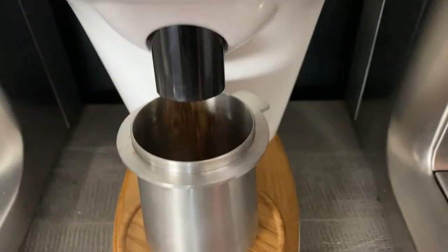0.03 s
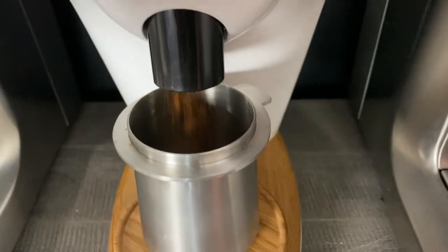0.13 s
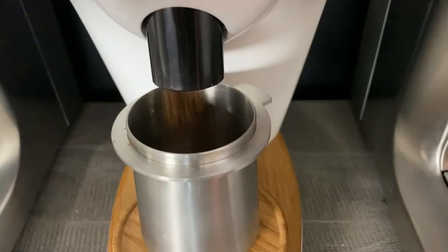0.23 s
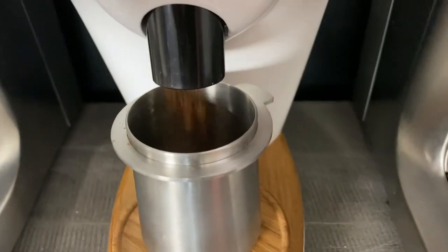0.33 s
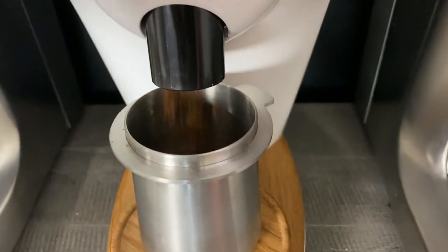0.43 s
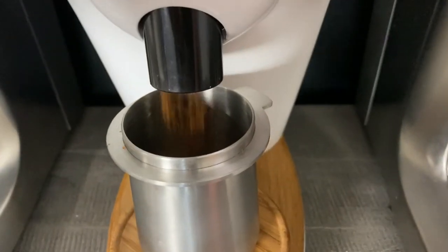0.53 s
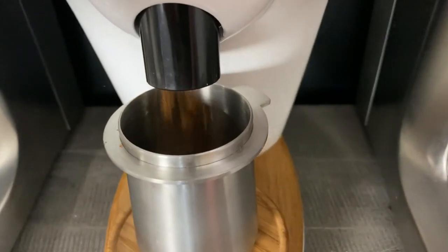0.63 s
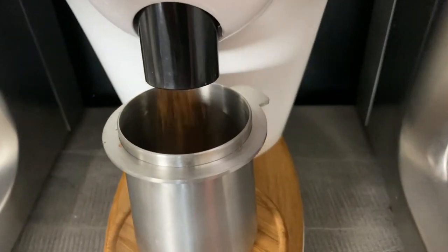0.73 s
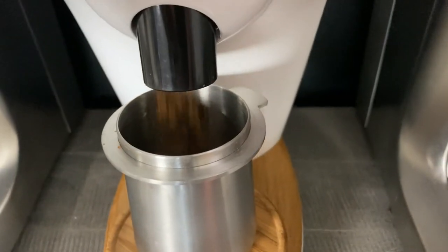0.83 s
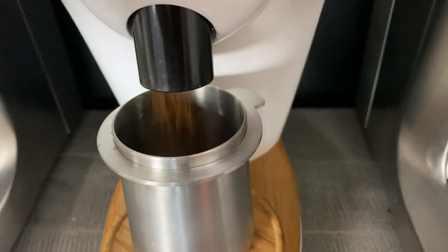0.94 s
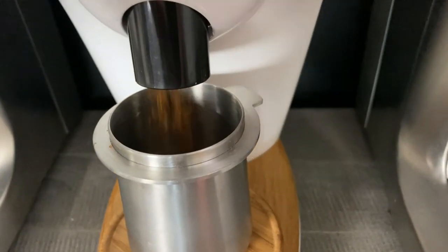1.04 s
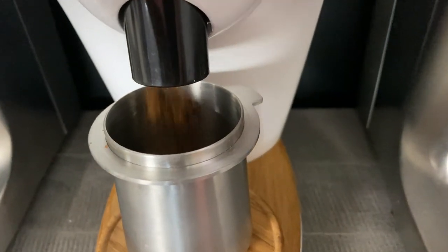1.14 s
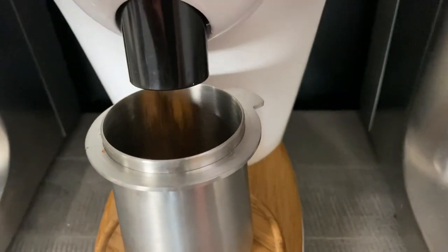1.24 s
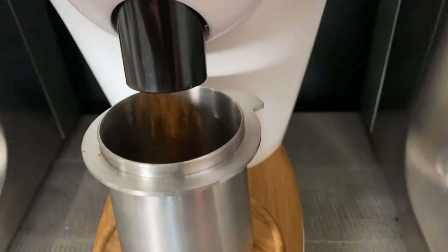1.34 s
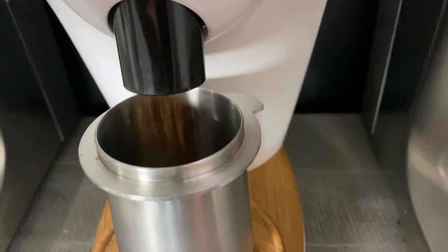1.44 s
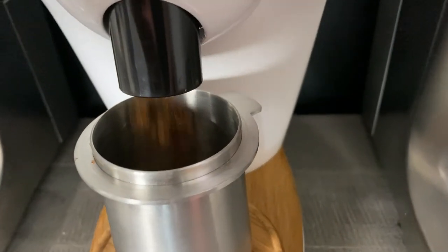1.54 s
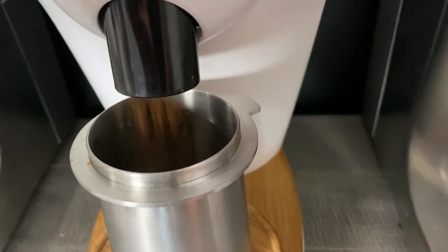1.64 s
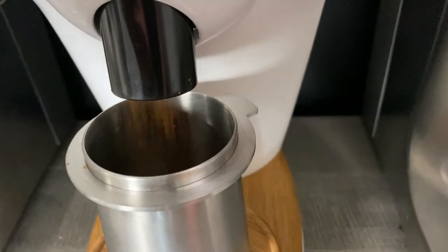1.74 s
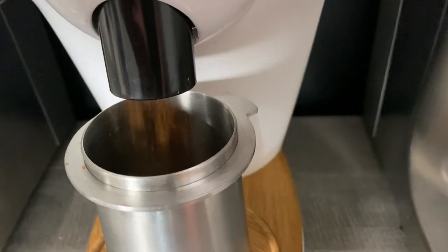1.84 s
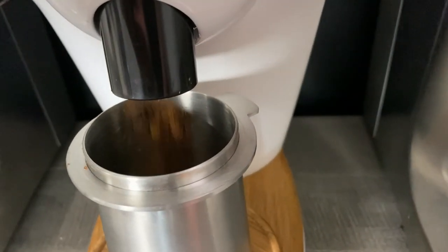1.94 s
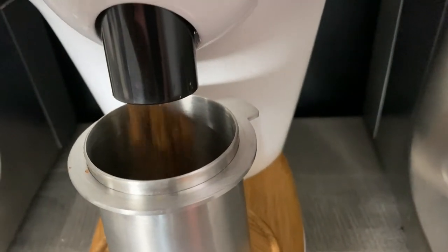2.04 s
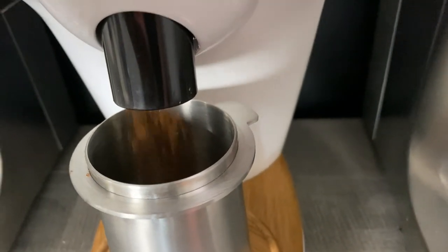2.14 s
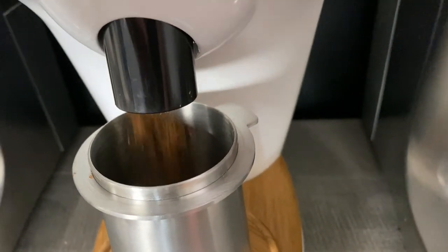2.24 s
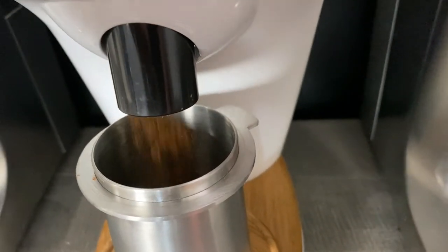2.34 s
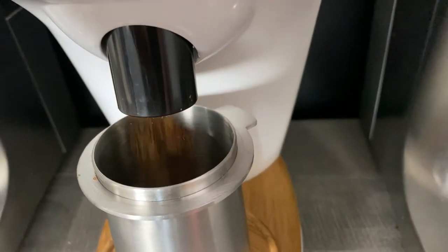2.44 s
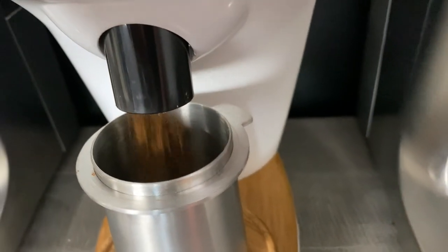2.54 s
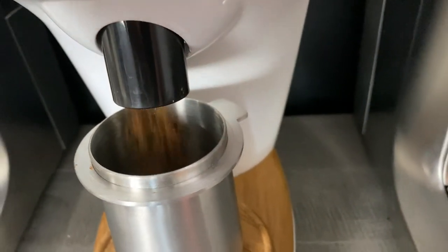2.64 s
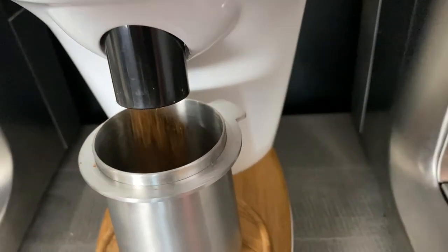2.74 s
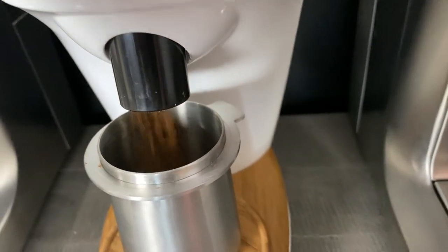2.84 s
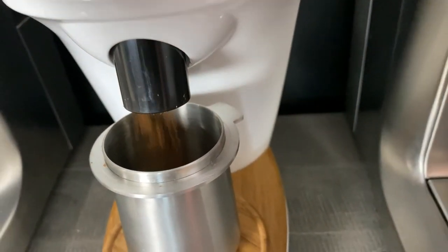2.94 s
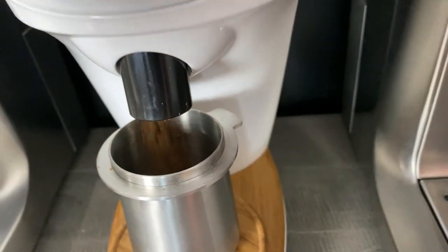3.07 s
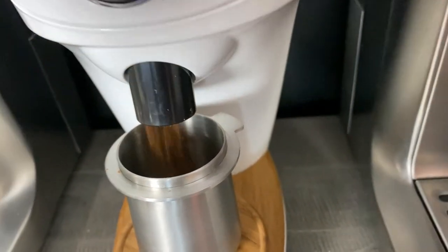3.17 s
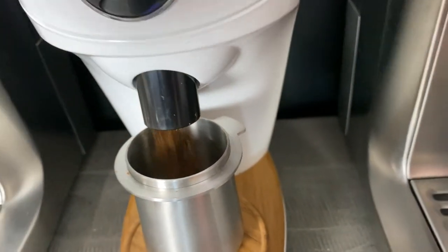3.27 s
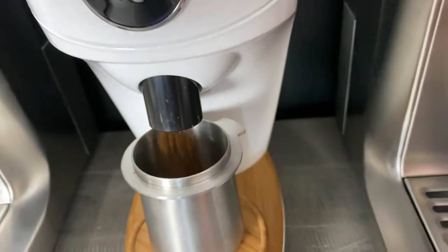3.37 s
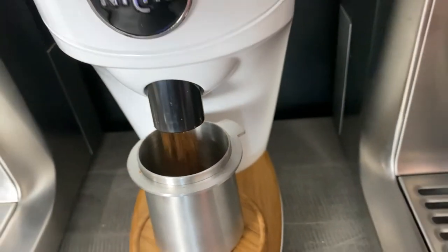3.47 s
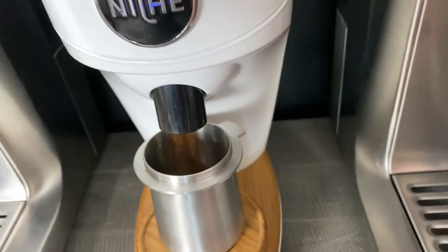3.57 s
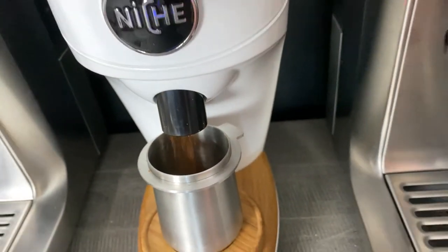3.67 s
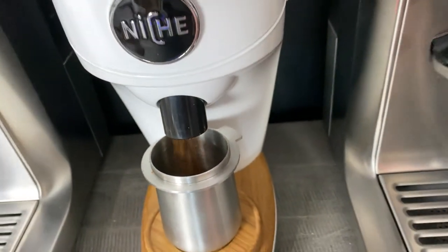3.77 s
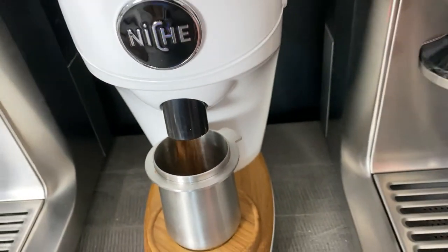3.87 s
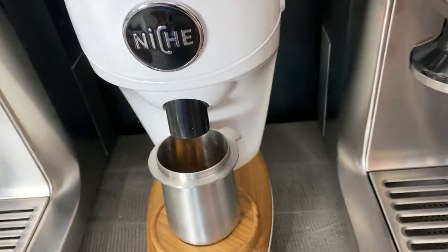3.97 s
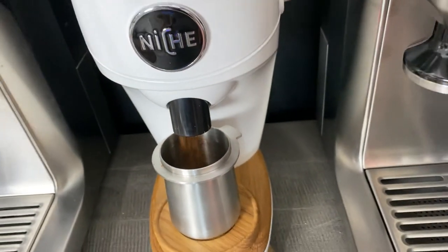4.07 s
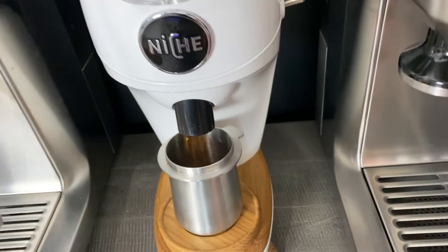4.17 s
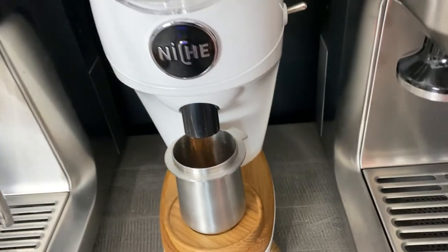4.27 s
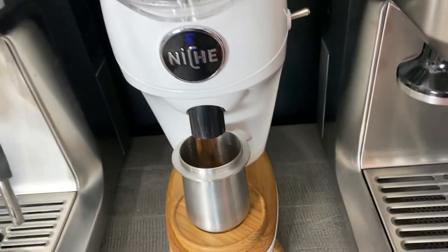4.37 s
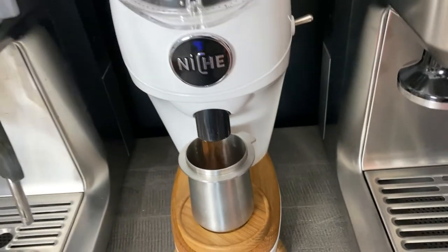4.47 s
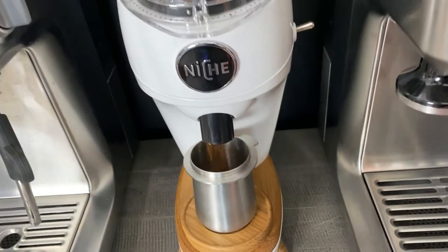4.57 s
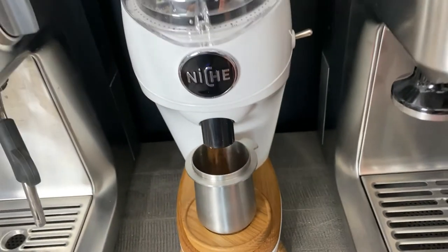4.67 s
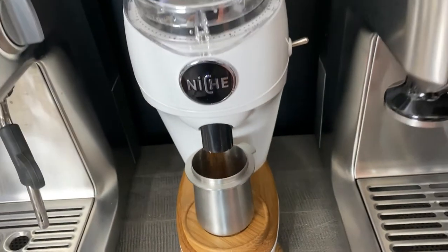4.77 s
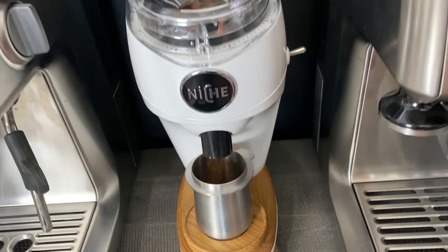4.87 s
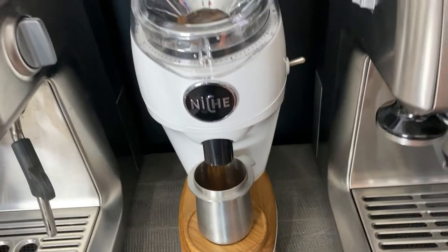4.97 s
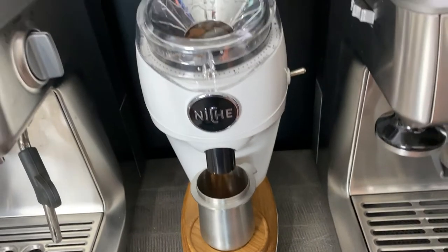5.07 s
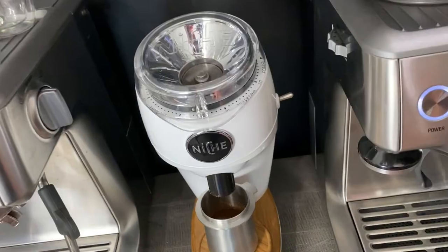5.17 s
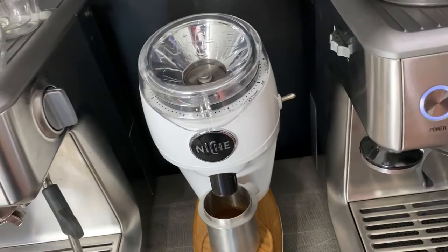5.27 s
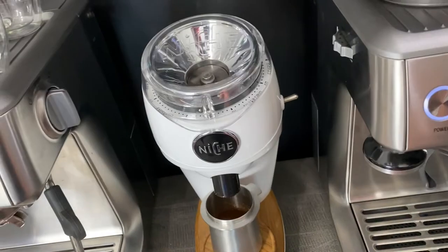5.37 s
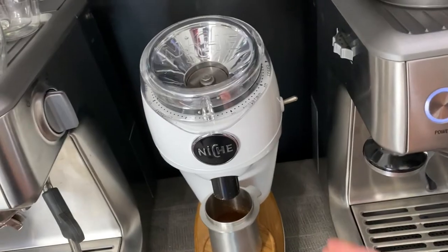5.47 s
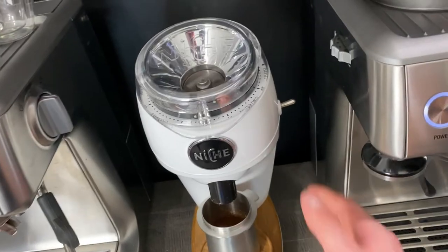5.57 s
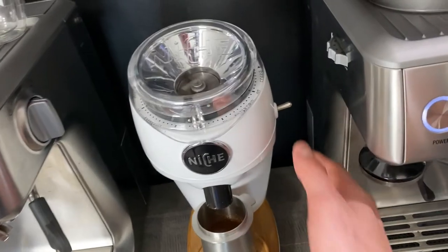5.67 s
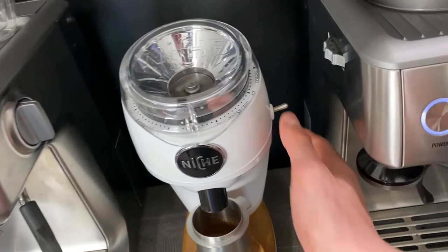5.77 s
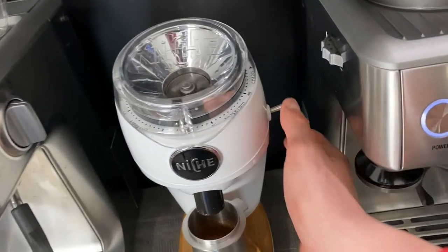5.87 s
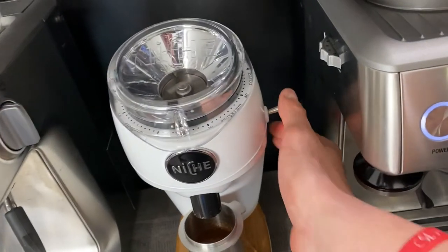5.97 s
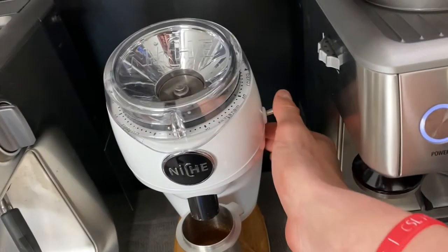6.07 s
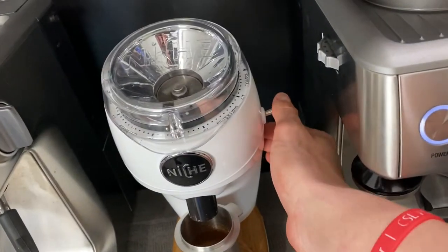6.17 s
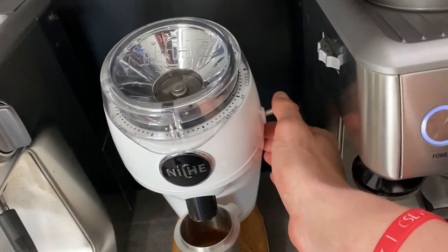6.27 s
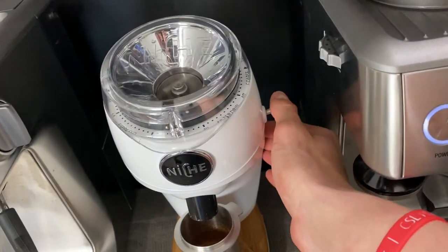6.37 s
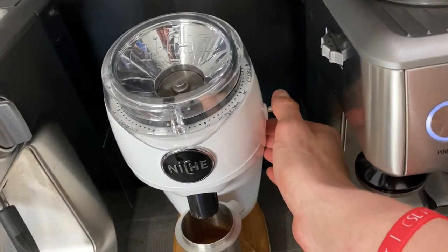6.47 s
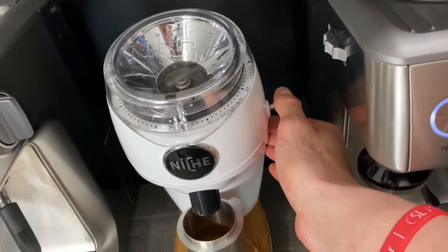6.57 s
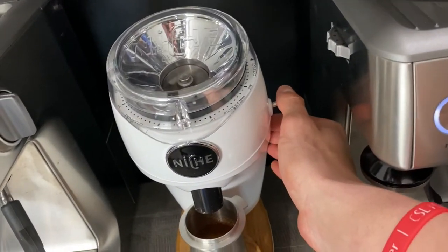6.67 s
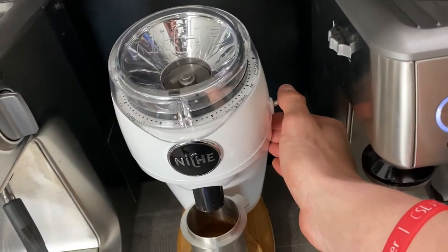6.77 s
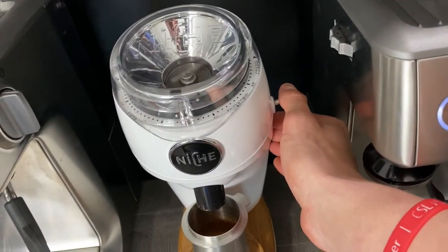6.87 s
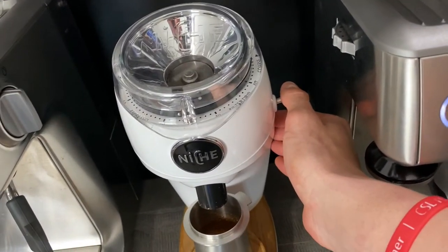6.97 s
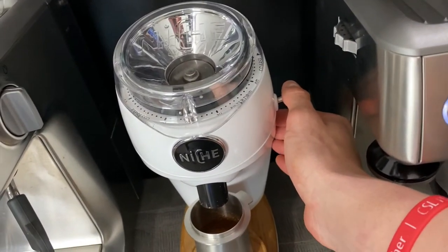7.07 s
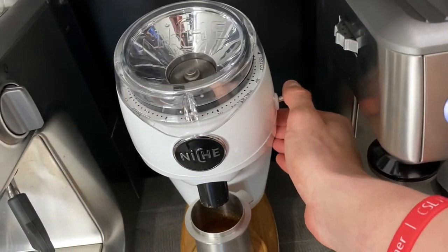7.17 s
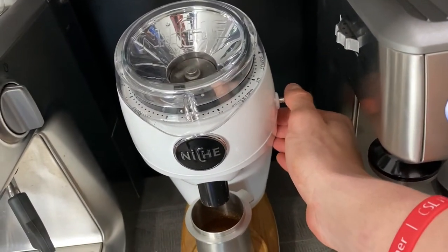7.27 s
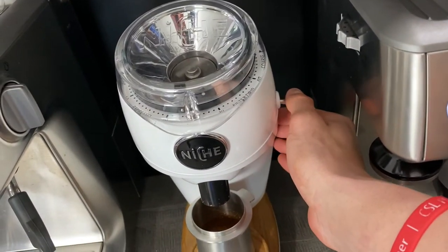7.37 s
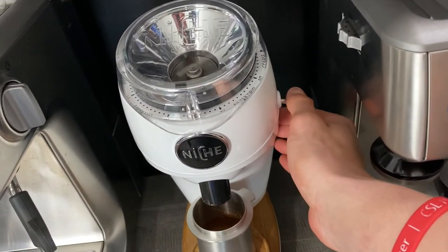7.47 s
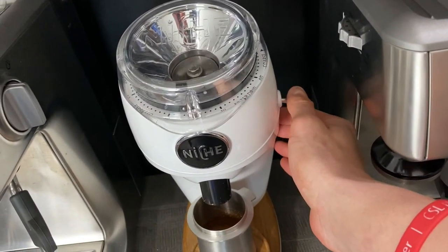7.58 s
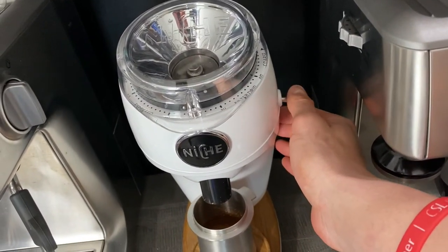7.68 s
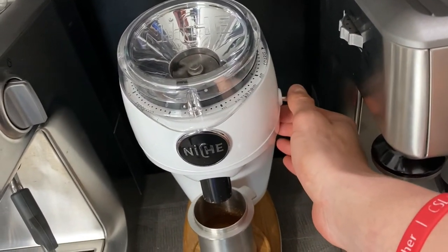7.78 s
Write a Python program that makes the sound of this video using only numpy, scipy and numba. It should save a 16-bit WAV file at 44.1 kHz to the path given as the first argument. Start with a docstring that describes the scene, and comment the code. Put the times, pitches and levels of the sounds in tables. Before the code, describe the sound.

Close to a hand-held phone in a kitchen, an electric burr grinder crushes coffee beans with a dense, rough crunch, fine crackle, sharp splits and low jolts over a mains hum. The crunch gradually thins, rings more in the funnel, then ends abruptly. Gears rattle much more quietly in a repeating pattern until a toggle switch snaps and the motor coasts downward.

```python
"""An electric burr grinder works on a kitchen counter, close to a hand-held phone. Beans crack and crumble between
the burrs: showers of random clicks ring the housing and funnel, with splits and jolts on top, over the mains hum.
The crunch thins out and ends abruptly. The gears rattle on: knocks at fixed places, much alike every turn.
A toggle switch snaps the power off, made from short puffs of noise. The motor then coasts and its gear tones slide
down. Behind it all lies the kitchen's faint drone and whine."""
import sys
import numpy as np
from scipy import signal
from scipy.fft import rfft, irfft
from scipy.io import wavfile
from scipy.ndimage import uniform_filter1d
from numba import njit

SR = 44100
rng = np.random.default_rng(int(sys.argv[2]) if len(sys.argv) > 2 else 0)


def waveform_to_disk(signal):
    """Save audio, clipped to [-1, 1], as 16-bit WAV at the path in sys.argv[1]."""
    frames = np.transpose(np.atleast_2d(signal))
    scaled = np.clip(frames, -1, 1) * 32767
    samples = np.round(scaled).astype(np.int16)
    wavfile.write(sys.argv[1], SR, samples)


N = 344421
T = np.arange(N) / SR  # time of each sample, s

# the crunch starts to thin, ends abruptly, and later the power goes off
THINNING_S, CRUNCH_END_S, POWER_OFF_S = 2.3, 5.234, 7.29

# tone of the crunch, the fine crackle and the low rumble: (frequency [Hz], relative level [dB])
CRUNCH_SPECTRUM = [(100, -29), (220, -11.5), (330, -10.5), (480, -6.5), (680, -3), (900, -8), (1500, -7.5),
                   (2000, -15), (2300, -23), (3300, -27), (4800, -34), (6500, -38), (15000, -61)]
CRACKLE_SPECTRUM = [(1000, -31.5), (2500, 5.5), (4500, 6.5), (5500, 0), (6500, -20), (8000, 5), (9500, 12),
                    (10500, 8), (11500, 11.5), (12500, 6.5), (14500, 4), (16000, -1)]
RUMBLE_SPECTRUM = [(22, -48), (40, -17.5), (60, -8.5), (82, 2), (100, -12), (128, -1), (165, -4),
                   (200, -10), (300, -20), (500, -39.5)]
# ringing of the housing: (frequency [Hz], width [Hz], lift [dB])
HOUSING_MODES = [(670, 240, 4), (1603, 21, -2.5), (1860, 400, 5.5), (2495, 120, 5.5), (2900, 200, 8.5),
                 (3240, 200, 6.5), (3600, 90, 2), (4200, 400, 4), (4800, 280, 5.5), (5850, 450, 5),
                 (7200, 600, 11)]
# ring of the bean funnel, which comes forward as the crunch thins: (time [s], level against the crunch [dB])
FUNNEL_LEVEL = [(0, -26), (2.7, -18), (3.4, -11), (3.95, -4), (4.3, -6.5), (4.7, -3), (5.2, -2)]
# swells and sags of the hum, which the crunch and rumble partly follow: (middle [s], length [s], lift [dB])
HUM_SWELLS = [(0.02, 0.16, 13.5), (.18, 0.073, -10), (.47, 0.23, 13.5), (.85, 0.083, -9),
              (1.457, 0.089, -16), (2.51, 0.085, -8), (2.663, 0.14, 5.5), (3.117, 0.1, -12),
              (3.982, 0.12, -7)]
# layers before echoes and swells: (level at full crunch dB, level at the end of the crunch dB)
CRUNCH_DB, CRACKLE_DB, RUMBLE_DB = (-21, -28.5), (-36.5, -43.5), (-31.5, -40)
# burr chamber and housing roar against the crunch: (at full crunch dB, at the end of the crunch dB)
CHAMBER_DB, ROAR_DB = (-10.5, -14.5), (-5.5, -13)
# resonances: middle Hz, width of each of two filter passes Hz, wander of the middle as a share
FUNNEL_BAND, CHAMBER_BAND, ROAR_BAND = (1345, 320, .035), (1905, 220, .025), (695, 170, .04)
# share of the hum's swells (in dB) that each layer follows
CRUNCH_SWELL_SHARE, RUMBLE_SWELL_SHARE = 0.11, 0.19

# whole beans splitting: (time [s], relative level [dB], ring [Hz], lift of the ring [dB])
BEAN_SPLITS = [(.1196, -25, 2950, 14), (.3631, -24, 2520, 12), (0.4863, -23, 4200, 12),
               (0.847, -24, 2920, 13), (1.0645, -25, 2880, 14), (1.5718, -25, 3270, 13),
               (2.172, -24, 3000, 12), (2.3246, -25, 2880, 13), (2.438, -12.5, 2100, 16),
               (2.449, -17.5, 3400, 11), (2.5157, -22, 3250, 13), (2.861, -16.5, 3260, 19),
               (2.978, -24, 3220, 18), (3.168, -23.5, 2510, 12), (3.5114, -24, 3220, 12),
               (3.674, -18.5, 3270, 16), (4.1575, -21, 2000, 13)]
# tone of a split: (frequency [Hz], relative level [dB])
SPLIT_SPECTRUM = [(300, -13), (1900, 4), (2600, 2), (3300, 3), (4200, 0), (5500, -5), (7000, -7),
                  (10000, -5), (15000, -6)]
# hard beans jolting the whole grinder: (time [s], level [dB])
HARD_BEANS = [(.625, -19), (1.179, -20), (1.325, -21), (1.395, -20), (1.605, -18), (1.688, -19.5),
              (1.75, -20), (1.82, -22), (1.94, -24), (2.136, -24), (2.281, -18.5)]
JOLT_HZ, JOLT_RISE_S = 144.3, 0.0063  # average pitch, time constant

# tight spots of the gears: (share of a burr turn [0-1], relative level [dB])
TIGHT_SPOTS = [(0, -3), (.047, -7), (.124, -1), (.16, -1), (.251, -5), (.329, 7.5), (.367, 1.5), (.425, -6),
               (.465, 3), (.543, 0), (.587, -5), (.666, 1.5), (.704, 2), (.815, -5), (.928, -1.5)]
# slack gears knocking as the motor coasts: (time [s], relative level [dB])
SLACK_KNOCKS = [(7.381, 4), (7.415, 3), (7.468, 3), (7.488, 7.5), (7.625, 5), (7.696, 4)]
# tone of the casing, the gear clack and the brushes: (frequency [Hz], relative level [dB])
CASING_SPECTRUM = [(40, -27), (80, 1.5), (200, -33), (330, -23), (520, -27), (660, -1), (850, -4),
                   (980, -11), (1300, -22), (3000, -56), (15000, -74)]
CLACK_SPECTRUM = [(300, -24), (700, -25), (1000, 7), (1550, 1), (2100, -13.5), (3100, -19), (5000, -34.5),
                  (15000, -41)]
BRUSH_SPECTRUM = [(400, 3), (1200, 11), (2000, 3.5), (3100, -7), (3700, -6), (4500, -6.5), (5300, -10),
                  (7000, -6.5), (9000, -5.5), (12000, -14.5), (15000, -11.5)]
# ringing of the gearbox: (frequency [Hz], width [Hz], lift [dB])
GEARBOX_MODES = [(682, 78, 10.4), (765, 26, 1.7), (840, 66, 9.9), (1016, 11, 3.8), (1211, 48, 7.3),
                 (1513, 27, 10.6), (2010, 17, 13), (2400, 50, 7.8), (2544, 100, 6.2), (3110, 310, 11),
                 (4410, 310, 12.2), (6980, 120, 2.3)]
# tones of the meshing teeth: (cycles per burr turn, relative level [dB])
MESH_TONES = [(100, -6), (123, -8), (137, -8), (149, 0), (178, -4)]
# magnetic whine of the rotor, only under power: (cycles per burr turn, level [dB])
ROTOR_TONES = [(149, -48), (647, -63), (826, -61.5), (1015, -74)]
# change of the rotor whine, added to those levels: (time [s], lift [dB])
ROTOR_LIFT = [(5.2, -10), (5.35, -2), (5.9, -6), (6.15, -4), (6.35, 0), (7.2, 0)]
IDLE_HZ, TURN_START_S = 6.831, 5.3  # burr turns per second running free, a moment when a turn starts
CRUNCH_SAG, COAST_PER_S = .07, .55  # speed share lost at full crunch, and lost per second of coasting
# layers before echoes: (running free dB, lift at full crunch dB, fall while coasting dB per s)
RING_DB, CLACK_DB, BRUSH_DB = (-37, 7, 13), (-41, 9.5, 28), (-45, -18, 30.5)
# the gears ring less until the crunch ends
DAMPED_DB = -5
# meshing tones: (level under power dB, lift once the power is off dB, fall while coasting dB per s)
MESH_DB = (-49, 8, 15)
# teeth and fast shaft against the knocks, scatter from blow to blow, scrape against each blow
TEETH_DB, SHAFT_DB, SCATTER_DB, SCRAPE_DB = -11.5, -17, .6, -22
# the magnetic pull peaks twice in each cycle of 60 Hz mains
PULL_HZ = 2 * 60
# hum before its swells: running free, grinding, and the typical size of its waver
HUM_FREE_DB, HUM_GRINDING_DB, HUM_WAVER_DB = -49.5, -36.5, 2.5

# lever, contacts and recoil: (time [s], relative level [dB], share reaching the shell [0-1], 60 dB decay [s])
SWITCH_BLOWS = [(7.2765, -19.5, 0.26, 0.055), (7.29, -9, 0.4, 0.0077), (7.289, -2, 0.13, 0.03),
                (7.2928, -2.5, 0.58, 0.027), (7.2950, -16, 0.8, 0.022), (7.3020, -15, 0.9, 0.025)]
# tone of the lever and of the plastic shell: (frequency [Hz], relative level [dB])
LEVER_SPECTRUM = [(400, -21), (1500, -1.5), (2100, -6), (3200, -0.5), (4200, 1.5), (5400, -9.5),
                  (6500, -9.5), (7500, -5), (8500, -7), (11000, -2.5), (15000, -14)]
SHELL_SPECTRUM = [(150, -35), (400, -12), (560, 2), (780, 6.5), (1200, 1.5), (2000, -1.5), (2700, 1.5),
                  (4000, -9), (7000, -8.5), (15000, -23)]
# ringing of the lever: (frequency [Hz], width [Hz], lift [dB])
LEVER_RINGS = [(2430, 160, 8), (2720, 160, 7), (3720, 380, 10), (4590, 160, 6), (5880, 140, 7),
               (6490, 160, 7)]
# tone of the kitchen's drone: (frequency [Hz], relative level [dB])
ROOM_SPECTRUM = [(22, -21), (55, 3.5), (100, -6.5), (250, -17.5), (800, -2), (2000, -42), (4500, -35),
                 (7000, -58), (15000, -46)]
# faint steady whine in the kitchen: (frequency [Hz], level [dB])
ROOM_WHINE = [(2094, -67), (4194, -70), (4721, -70)]
TOP_HZ = 15700  # highest pitch the phone keeps


def grinding(crumble_db=8.5):
    """Each fracture frees a short shower of fragments, which ring the housing and funnel and jolt the body."""
    crunch_db, crackle_db, rumble_db, chamber_db, roar_db = (
        end + (full - end) * fullness()
        for full, end in (CRUNCH_DB, CRACKLE_DB, RUMBLE_DB, CHAMBER_DB, ROAR_DB))
    funnel_db, = curves(FUNNEL_LEVEL)
    fractures = unit(fade(np.abs(grains(rate=330, spread_db=3)), t60=.013))
    # steady crumbling lies under the fractures; the torque pulses with the mains
    bite = (fractures + undb(crumble_db)) * (1 + 0.058 * np.sin(2 * np.pi * PULL_HZ * T))
    # the bite is uneven, more so as the crunch thins
    bite = bite * undb((1.3 - .5 * fullness()) * walk(rate=45) + .3 * walk(rate=8))

    chips = bite * grains(rate=2500, spread_db=2.5)
    funnel = resonance(chips, *FUNNEL_BAND) * undb(funnel_db)
    chamber = resonance(chips, *CHAMBER_BAND) * undb(chamber_db)
    roar = resonance(bite * grains(rate=700, spread_db=2.5), *ROAR_BAND) * undb(roar_db)
    crumbs = unit(colour(bite * grains(rate=6000, spread_db=1.5), CRUNCH_SPECTRUM, HOUSING_MODES))
    crunch = unit(crumbs + roar + funnel + chamber)
    crunch = crunch * undb(crunch_db + CRUNCH_SWELL_SHARE * swell_db())

    fine_bite = bite * undb(1.1 * walk(rate=27))
    fine_chips = fine_bite * grains(rate=7000, spread_db=3.0)
    crackle = unit(colour(fine_chips, CRACKLE_SPECTRUM, HOUSING_MODES)) * undb(crackle_db)
    rumble = unit(colour(bite * grains(rate=540, spread_db=3.5), RUMBLE_SPECTRUM))
    rumble = rumble * undb(rumble_db + RUMBLE_SWELL_SHARE * swell_db())

    sound = kitchen(crunch + crackle, near_db=-4.0, room_db=-7, left_db=2.0, count=5)
    sound += kitchen(rumble, near_db=-5.5, room_db=-3, left_db=-2.5, count=3)
    return sound * until(CRUNCH_END_S, fade_s=0.011)


def splits():
    """Whole beans burst with a sharp crack and a spray of pieces, and set the burr ringing."""
    cracks = 0
    for s, db, ring_hz, ring_db in BEAN_SPLITS:
        sharp_crack = undb(6) * burst(s, t60=.016)
        spray = undb(-1) * burst(s, t60=.055)
        cracks = cracks + undb(db) * colour(sharp_crack + spray, SPLIT_SPECTRUM, [(ring_hz, 340, ring_db)])
    return kitchen(cracks, near_db=-8, room_db=-14, left_db=1.2)


def jolts():
    """A hard bean rocks the body on its feet for a few cycles, each at a slightly different pitch."""
    thumps = 0
    for (s, db), detune in zip(HARD_BEANS, rng.standard_normal(len(HARD_BEANS))):
        age = np.maximum(T - s, 0)
        swing = age / JOLT_RISE_S * np.exp(1 - age / JOLT_RISE_S)
        hz = JOLT_HZ * (1 + 0.082 * detune)
        thumps = thumps + undb(db) * swing * np.sin(2 * np.pi * hz * age)
    return thumps


def gears():
    """Tight spots knock once a turn and teeth tick between them; brushes hiss and the fast rotor whines."""
    speed = 1 - CRUNCH_SAG * fullness() - COAST_PER_S * coasting()
    ring_db, clack_db, brush_db = (
        free + lift * fullness() - fall * coasting() for free, lift, fall in (RING_DB, CLACK_DB, BRUSH_DB))
    shaft = np.cumsum(speed) * IDLE_HZ / SR  # burr turns so far
    shaft -= shaft[int(TURN_START_S * SR)]
    # play between the teeth makes each contact a little early or late
    turn = shaft + .0003 * walk(rate=60)

    knocks = sum(undb(db) * strikes(turn - share) for share, db in TIGHT_SPOTS)
    teeth = undb(TEETH_DB) * (strikes(turn, count=24) + strikes(turn, count=30))
    fast_shaft = undb(SHAFT_DB) * strikes(turn, count=50)
    slack = sum(undb(db) * (np.arange(N) == int(s * SR)) for s, db in SLACK_KNOCKS)
    blows = (knocks + teeth + fast_shaft + slack) * undb(SCATTER_DB * rng.standard_normal(N))

    # tooth flanks scrape after each blow; part of their roughness comes round again every turn
    flanks = rng.standard_normal(8192)[(turn % 1 * 8192).astype(int) % 8192]
    scrape = fade(blows, t60=0.019) * (flanks + .5 * rng.standard_normal(N))
    contacts = blows + undb(SCRAPE_DB) * scrape
    damping_db = DAMPED_DB * until(CRUNCH_END_S, fade_s=.02)
    ring = unit(colour(contacts, CASING_SPECTRUM, GEARBOX_MODES)) * undb(ring_db + damping_db)
    clack = unit(colour(contacts, CLACK_SPECTRUM, GEARBOX_MODES)) * undb(clack_db)

    # as the motor slows, the meshing tones slide down through the gearbox resonances and flare in each
    mesh = 0
    for cycles, db in MESH_TONES:
        level = undb(db + 3 * walk(rate=25))
        mesh = mesh + level * np.sin(2 * np.pi * cycles * turn + .8 * walk(rate=30))
    powered_db, slack_db, fall_db = MESH_DB
    mesh_db = powered_db + slack_db * (T > POWER_OFF_S) - fall_db * coasting()
    mesh = unit(colour(mesh, CASING_SPECTRUM, GEARBOX_MODES)) * undb(mesh_db)

    # the brush noise swells briefly after each blow
    sparks = rng.standard_normal(N) * (1 + 0.47 * unit(fade(blows, t60=0.023)))
    hiss = unit(colour(sparks, BRUSH_SPECTRUM, GEARBOX_MODES)) * undb(brush_db)

    rotor_db, = curves(ROTOR_LIFT)
    whine = 0
    for cycles, db in ROTOR_TONES:
        level = np.sqrt(2) * undb(rotor_db + db + 2 * walk(rate=7.7))
        whine = whine + level * np.sin(2 * np.pi * cycles * shaft + .3 * walk(rate=15))
    whine = whine * until(POWER_OFF_S, fade_s=.02)

    rattle = kitchen(ring + clack + mesh, near_db=-14, room_db=-10, left_db=0, count=2)
    return rattle + kitchen(hiss, near_db=4.0, room_db=-4.5, left_db=2.5) + whine


def hum():
    """The motor's magnetic hum is louder while it grinds, swells and wavers, and stops with the power."""
    is_grinding = until(CRUNCH_END_S, fade_s=0.012)
    hum_db = HUM_FREE_DB + (HUM_GRINDING_DB - HUM_FREE_DB) * is_grinding + swell_db()
    phase = 2 * np.pi * PULL_HZ * T + 0.37 * walk(rate=4.9)
    tone = np.sqrt(2) * (np.sin(phase) + undb(-20.0) * np.sin(2 * phase))
    return tone * undb(hum_db + HUM_WAVER_DB * walk(rate=13)) * until(POWER_OFF_S, fade_s=0.018)


def switch():
    """The sprung lever snaps over, then thumps the plastic shell, which spreads the sound into the room."""
    lever, shell = 0, 0
    for s, db, share, t60 in SWITCH_BLOWS:
        blow = undb(db) * burst(s, t60)
        lever = lever + (1 - share) * blow
        shell = shell + share * blow
    snap = undb(1.5) * colour(lever, LEVER_SPECTRUM, LEVER_RINGS)
    thump = undb(6) * colour(shell, SHELL_SPECTRUM)
    return (kitchen(snap, near_db=-12, room_db=-14, left_db=1)
            + kitchen(thump, near_db=-7, room_db=-8, left_db=.6))


def room_tone():
    """Faint steady noise of the kitchen: filtered noise as a low drone, and a few sines as a thin whine."""
    whine = 0
    for hz, db in ROOM_WHINE:
        whine = whine + np.sqrt(2) * undb(db) * np.sin(2 * np.pi * hz * T + 0.45 * walk(rate=31))
    drone = unit(colour(rng.standard_normal(N), ROOM_SPECTRUM)) * undb(-46.0)
    return whine + kitchen(drone, near_db=-6.0, room_db=-26, left_db=-1.5)


def kitchen(x, near_db, room_db, left_db, count=1):
    """Direct sound, quick reflections from the machines alongside and the room's tail, different at each port.
    As the phone moves, the echo pattern wanders between count places."""
    t = T[:SR // 3]
    places = np.array([walk(rate=1.201) for _ in range(count)]) if count > 1 else np.ones((1, N))
    places /= np.linalg.norm(places, axis=0)
    echo_spectrum = [(40, -11), (130, -3.0), (350, -7), (650, -1.5), (2500, 4.5), (5500, 3.0), (9000, -1.5)]
    out = np.array([x, x])
    for port in range(2):
        for weight in places:
            # noise dying by 60 dB in t60 seconds: quick reflections, then the tail
            near, tail = (
                rng.standard_normal(len(t)) * undb(-60 * t / t60) * (t > .001) for t60 in (.035, .38))
            echoes = undb(near_db) * near / np.linalg.norm(near)
            echoes = echoes + undb(room_db) * tail / np.linalg.norm(tail)
            echoes = colour(echoes, echo_spectrum)
            out[port] += weight * signal.oaconvolve(x, echoes)[:N]
    return out * undb([[left_db / 2], [-left_db / 2]])


def fullness():
    """1 at full crunch, falling to 0 where the crunch abruptly ends."""
    return np.clip((CRUNCH_END_S - T) / (CRUNCH_END_S - THINNING_S), 0, 1)


def coasting():
    """Seconds since the power went off."""
    return np.maximum(T - POWER_OFF_S, 0)


def swell_db():
    """Rounded swells and sags of the hum, in dB, which the crunch and rumble partly follow."""
    return sum(lift_db * np.maximum(1 - (2 * (T - s) / length) ** 2, 0) for s, length, lift_db in HUM_SWELLS)


def strikes(turn, count=1):
    """A unit impulse, count times in each turn."""
    return np.diff(np.floor(turn * count), prepend=np.floor(turn[0] * count))


def grains(rate, spread_db):
    """Clicks at random times (rate per second on average), of random sign and varying size."""
    clicks = rng.random(N) < rate / SR
    signs = np.sign(rng.standard_normal(N))
    return clicks * signs * undb(spread_db * np.clip(rng.standard_normal(N), -2, 2))


def burst(start_s, t60):
    """A puff of tiny contacts that dies away by 60 dB in t60 seconds; peak near 1."""
    t = T[:SR // 5]
    puff = rng.standard_normal(len(t)) * undb(-60 * t / t60) / 2
    return np.concatenate([np.zeros(int(start_s * SR)), puff, np.zeros(N)])[:N]


def fade(x, t60):
    """Give every impulse an exponential tail, falling 60 dB in t60 seconds."""
    return signal.lfilter([1], [1, -undb(-60 / (t60 * SR))], x)


def resonance(x, hz, width, wander):
    """A steep resonance whose centre shifts as the beans tumble; rms 1."""
    centre = hz * (1 + wander * walk(rate=17))
    once = moving_band(x, centre, 1. * width)
    return unit(moving_band(once, centre, 1. * width))


@njit
def moving_band(x, hz, width):
    """State-variable band-pass with a moving centre."""
    y, band, low = np.empty(len(x)), 0., 0.
    for i in range(len(x)):
        g, damping = np.tan(np.pi * hz[i] / SR), width / hz[i]
        v = (band + g * (x[i] - low)) / (1 + g * (g + damping))
        band = 2 * v - band
        low = low + 2 * g * v
        y[i] = damping * v
    return y


def colour(x, points, peaks=(), size=8192):
    """Causal filter with a smooth spectrum and ringing resonances on top."""
    f = np.arange(size // 2 + 1) * SR / size
    hz, db = np.transpose(points)
    db = np.interp(np.log(f + 1), np.log(hz), db)
    for centre, width, lift in peaks:
        db = db + lift / (1 + (2 * (f - centre) / width) ** 2)
    # folding the cepstrum forward gives minimum phase: the response starts at once
    cepstrum = irfft(np.log(undb(db)))
    cepstrum[1:size // 2] *= 2
    cepstrum[size // 2 + 1:] = 0
    response = irfft(np.exp(rfft(cepstrum)))
    return signal.oaconvolve(x, response)[:len(x)]


def walk(rate):
    """Random levels, rate per second, joined by smooth slopes; rms 1."""
    k = max(int(SR / rate), 1)
    held = rng.standard_normal(N)[np.arange(N) // k]
    return unit(uniform_filter1d(held, k))


def curves(rows):
    """One control per column, joined by straight lines in time."""
    s, *columns = np.transpose(rows)
    return [np.interp(T, s, c) for c in columns]


def until(end_s, fade_s):
    """1 up to the given time, then a straight fall to 0 over fade_s."""
    return np.clip((end_s - T) / fade_s + 1, 0, 1)


def undb(db):
    """Decibels to gain."""
    return 10 ** (np.asarray(db) / 20)


def unit(x):
    """Scale to rms 1."""
    return x / np.sqrt(np.mean(x ** 2))


def scene():
    """Grinder, switch and room at the two microphone ports."""
    return grinding() + splits() + jolts() + gears() + hum() + switch() + room_tone()


def record(dry):
    """The phone builds its treble from one port, turning its phase between left and right, and cuts the top."""
    f = np.arange(N + 1) * SR / (2 * N)
    left, right = rfft(dry, 2 * N)
    right = right * np.exp(-2j * np.pi * f / SR)  # the right port is one sample further away
    # from 6 to 8 kHz the right side passes over to a turned copy of the left
    treble = np.clip((f - 6000) / 2000, 0, 1) * np.pi / 2
    turned = left * np.exp(2j * np.pi * (f - 10150) / 3800)
    right = right * np.cos(treble) + turned * np.sin(treble)
    sound = irfft([left, right])[:, :N]
    sound = signal.sosfilt(signal.butter(2, 32, "high", fs=SR, output="sos"), sound)
    return signal.sosfilt(signal.ellip(8, .2, 70, TOP_HZ, fs=SR, output="sos"), sound)


dry = scene()
out = record(dry)
waveform_to_disk(out)
```